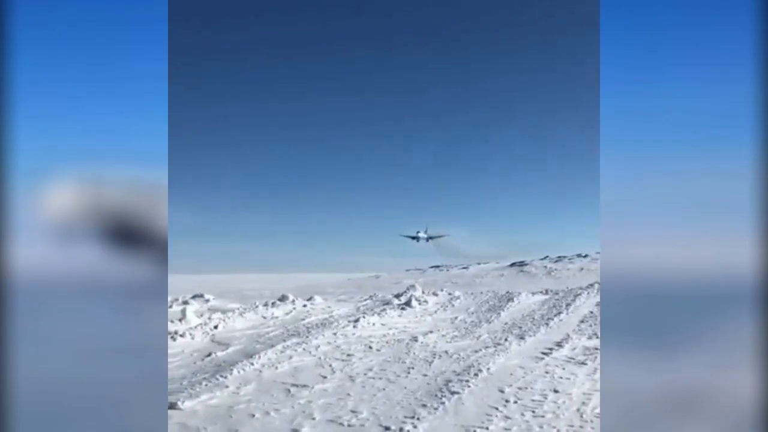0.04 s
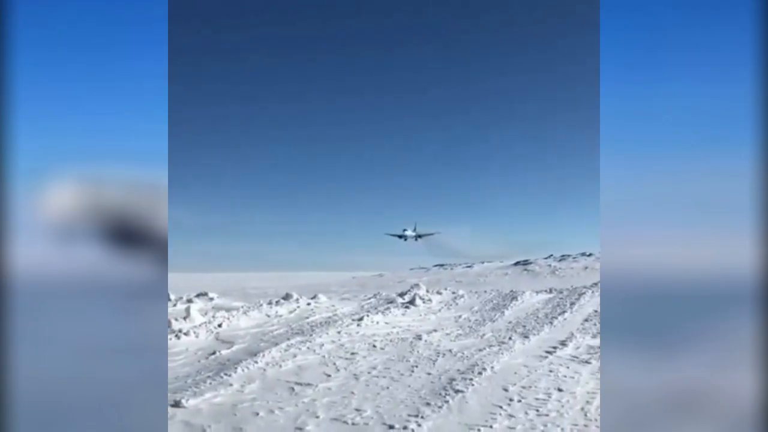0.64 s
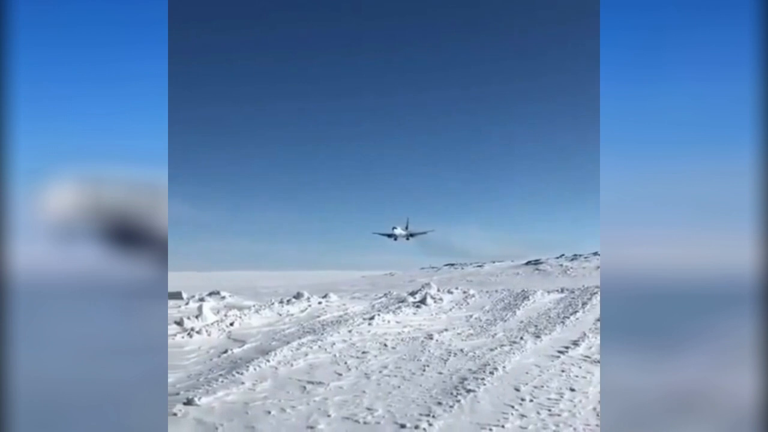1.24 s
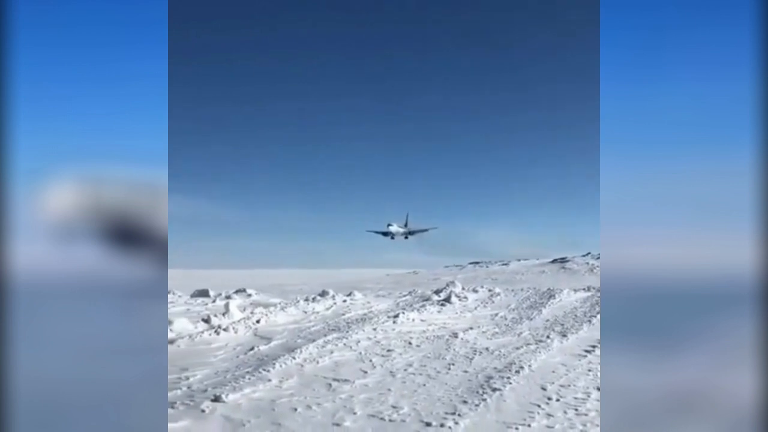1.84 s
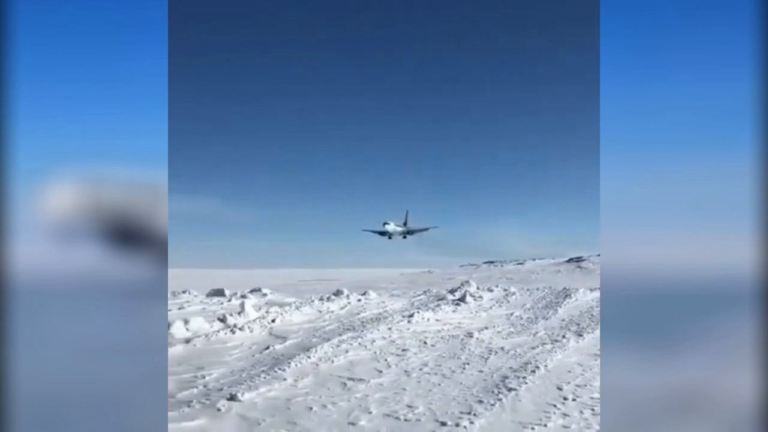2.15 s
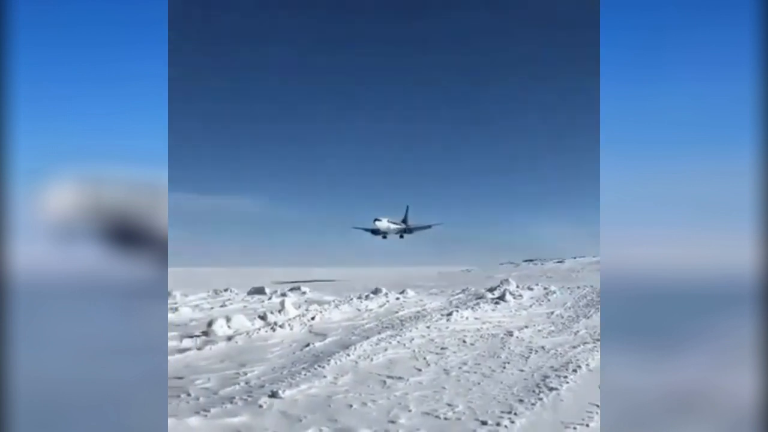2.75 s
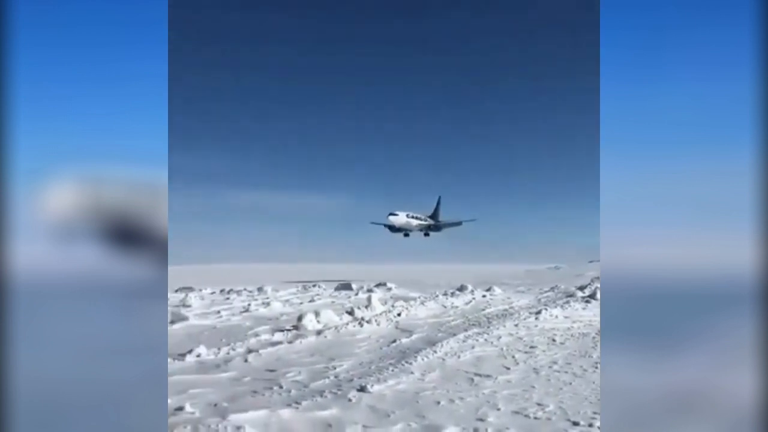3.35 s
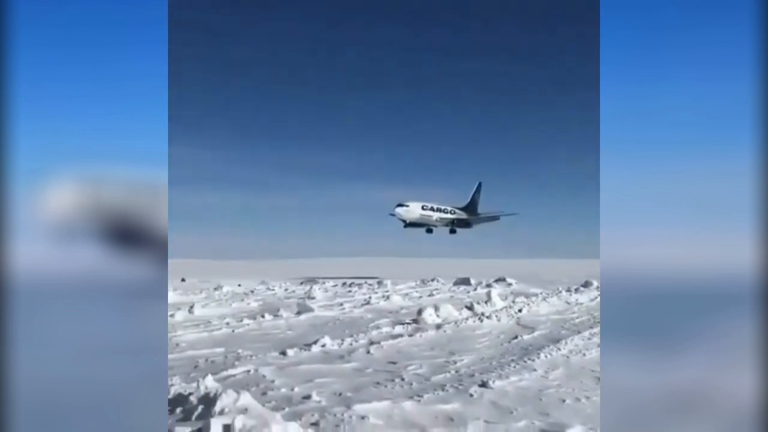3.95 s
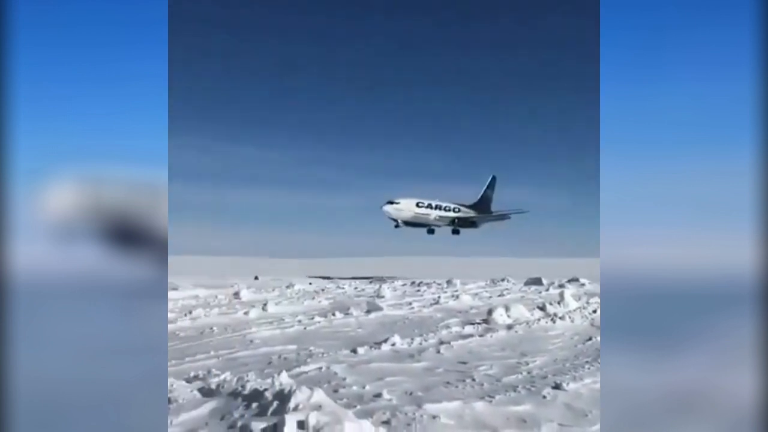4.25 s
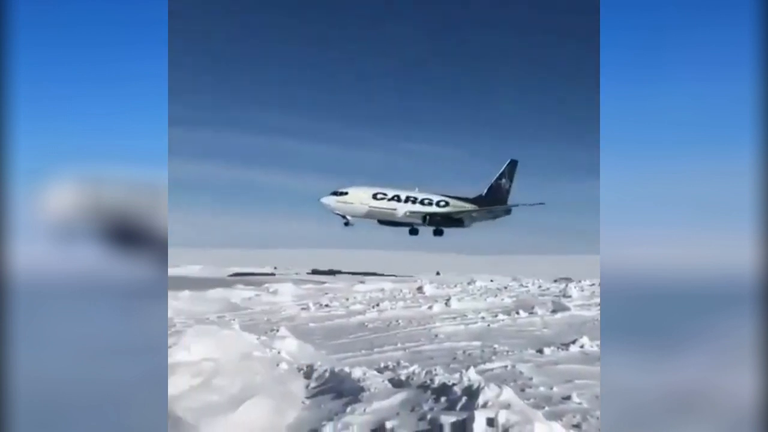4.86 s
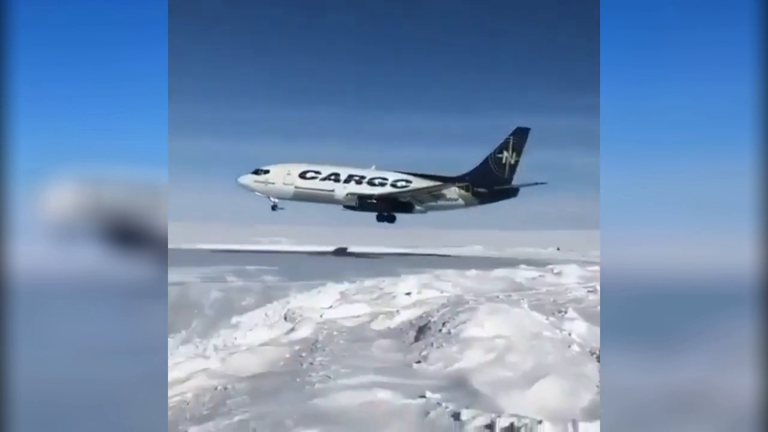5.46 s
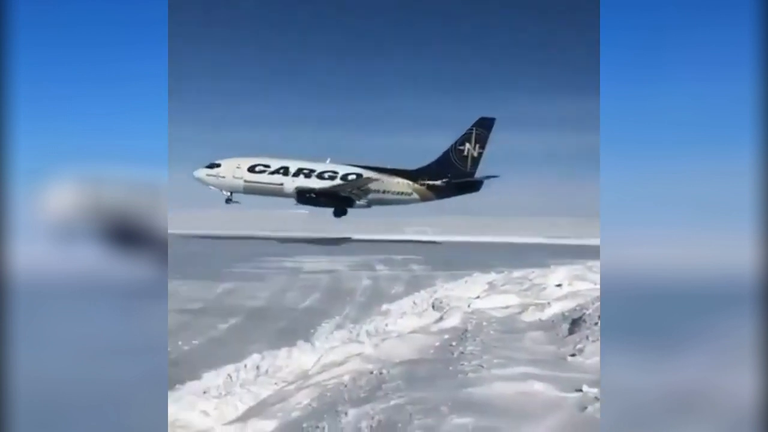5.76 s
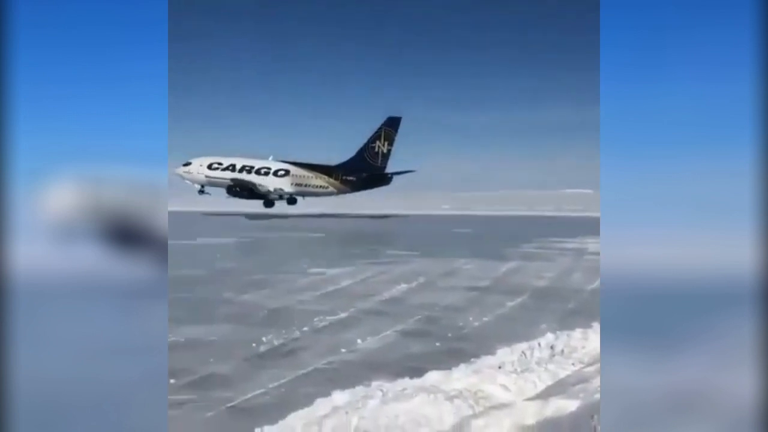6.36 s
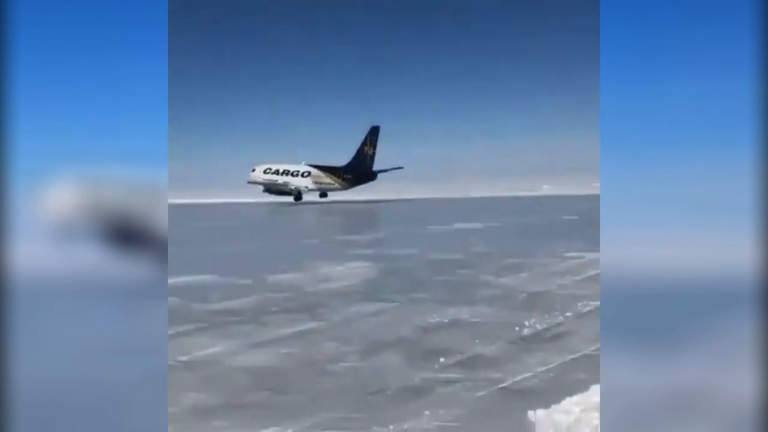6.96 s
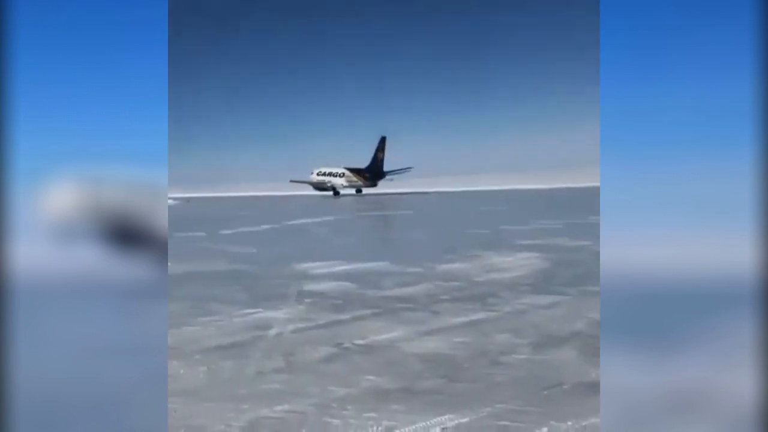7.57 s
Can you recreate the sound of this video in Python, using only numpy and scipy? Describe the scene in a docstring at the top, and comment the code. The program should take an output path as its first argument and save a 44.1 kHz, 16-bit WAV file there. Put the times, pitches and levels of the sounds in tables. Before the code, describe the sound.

A jet airliner approaches low over open snow, starting as a soft rush and low rumble, with a fluttering hiss rising in the first half second. From about 1 second a thin, high turbine whine wavers and flares into short whistles, most strongly between 2 and 4 seconds, while a midrange buzz and a slightly hollow roar build. Around 4.5 to 5 seconds several high whining tones swell together, then fall in pitch and fade. The rush of air is loudest at about 5.3 seconds as the plane passes close. From 5.5 to 6.3 seconds a faint, breathy whistle slides downward inside bright hiss. At about 6 seconds a deep exhaust rumble jumps up and takes over. After 7 seconds the hiss drops away and the roar grows duller and softer, still sounding at the end near 7.7 seconds.

```python
"""Open snow under an approach path: a twin jet airliner comes in low, passes and draws away.
Ahead of it the intake blades whine, buzz and hiss, sinking in pitch and fluttering in the uneven air.
Flaps and landing gear roar loudest abeam, a breathy whistle slides down as the engines go by,
and the exhaust rumble takes over once the tail points this way.
A bounce off the snow sweeps hollows through the roar."""
import sys
import numpy as np
from scipy import signal
from scipy.fft import rfft, irfft
from scipy.io import wavfile
from scipy.ndimage import uniform_filter1d, map_coordinates

SR = 44100
rng = np.random.default_rng(int(sys.argv[2]) if len(sys.argv) > 2 else 0)


def transcribe(u):
    """Save the signal u as a 16-bit wav file named by the first command-line argument.

    u: samples, shape (n,) or (channels, n), limited to [-1, 1]; the rate is SR.
    q: integer samples, one column per channel.
    """
    v = np.clip(np.atleast_2d(u).T, -1, 1)
    q = np.round(v * 32767).astype(np.int16)
    wavfile.write(sys.argv[1], SR, q)


N = 340452
TIME = np.arange(N) / SR
TAIL_TURN_S = 6.095

# the fan shaft winds down for landing: time_s, speed_hz
FAN_SHAFT = [(0, 96.3), (.7, 94.9), (1.5, 93.2), (2.05, 91.95), (3.15, 90.95), (4.35, 89.6), (7.72, 85.2)]
# uneven air focuses a tone into a short whistle: peak_s, length_s, relative_db, tone_name
FLARES = [(.3, 0.68, -54.5, "fan x2"), (.42, 0.075, -49, "stage 4"), (.92, 0.12, -40.5, "compressor"),
          (1.16, 0.08, -46, "compressor"), (1.345, 0.081, -41.5, "compressor"),
          (1.5, .12, -35, "compressor"), (1.56, 0.1, -48, "stage 4"), (1.88, .12, -32, "compressor"),
          (2.073, 0.11, -45, "fan x2"), (2.262, 0.13, -30, "fan x2"), (2.41, 0.09, -30, "compressor"),
          (2.478, .12, -26, "fan x2"), (2.69, 0.15, -28.3, "compressor"), (2.8, 0.12, -31, "fan x2"),
          (3.145, .14, -31.5, "stage 4"), (3.152, 0.18, -41, "stage 1"), (3.505, 0.11, -40, "compressor"),
          (3.73, .12, -41, "fan x2"), (3.764, 0.11, -29, "stage 4"), (3.763, 0.12, -40, "fan x3"),
          (3.93, .08, -36, "stage 4"), (4.338, 0.088, -34, "stage 4"), (4.757, 0.1, -35, "stage 4"),
          (4.96, 0.07, -34, "fan x3")]


def undb(db):
    """Decibels to gain."""
    return 10 ** (np.asarray(db) / 20)


def curves(table):
    """The columns of a table, joined by straight lines in time."""
    times, *columns = np.transpose(table)
    return [np.interp(TIME, times, column) for column in columns]


def walk(rate_hz):
    """A smooth random wobble with a spread of 1."""
    hold = max(int(SR / rate_hz), 2)
    held = np.repeat(rng.standard_normal(N // hold + 2), hold)[rng.integers(hold):][:N]
    smooth = uniform_filter1d(uniform_filter1d(held, hold), hold // 2)
    return smooth / smooth.std()


def swell(peak_s, length_s):
    """A bell-shaped swell of height 1, above half for the given length."""
    return .5 ** ((2 * (TIME - peak_s) / length_s) ** 2)


def swells(table):
    """Level in dB of a row of bell-shaped swells."""
    return sum(db * swell(peak_s, length_s) for peak_s, length_s, db in table)


def beam(peak_s, peak_db, rise_db_s, fall_db_s):
    """Level in dB as a beam of sound sweeps over the listener: a steady climb, then a steady fall."""
    return peak_db - rise_db_s * np.maximum(peak_s - TIME, 0) - fall_db_s * np.maximum(TIME - peak_s, 0)


def split(x, hz):
    """The parts of a sound below and above a frequency."""
    below = signal.sosfiltfilt(signal.butter(2, hz, fs=SR, output="sos"), x)
    return below, x - below


def narrow_noise(phase, width_hz):
    """A narrow band of noise that follows a turning phase; rms 1."""
    return walk(width_hz) * np.sin(phase) + walk(width_hz) * np.cos(phase)


def coloured(x, colour, band_hz):
    """Spectrum of a white sound given a colour and an rms of 1 within the band, and its frequencies."""
    hz = np.arange(N // 2 + 1) * SR / N
    points, db = np.transpose(colour)
    spectrum = rfft(x) * undb(np.interp(np.log(hz + 1), np.log(points), db))
    spectrum *= np.minimum(hz / points[0], 1) ** 2 * np.minimum(points[-1] / (hz + 1), 1) ** 2
    inside = spectrum[(hz > band_hz[0]) & (hz < band_hz[1])]
    return spectrum * N / np.sqrt(2 * np.sum(abs(inside) ** 2)), hz


def turbulence(x, colour, band_hz, churn_db, churn_hz):
    """Coloured noise whose octaves swell and sink on their own as eddies come and go."""
    spectrum, hz = coloured(x, colour, band_hz)
    octave = np.clip(np.log2((hz + 1) / 60), 0, 6)
    out = 0
    for k in range(7):
        layer = irfft(spectrum * np.maximum(1 - abs(octave - k), 0), N)
        out = out + layer * undb(churn_db * np.minimum(walk(churn_hz), 1.3))
    return out


def doppler(speed_m_s=65.6, closest_m=49.9, abeam_s=5.63):
    """Pitch as heard over pitch on board: high on the straight approach, falling through the pass."""
    mach = speed_m_s / 343
    along_m = speed_m_s * (TIME - abeam_s)
    squeeze = 1 - mach ** 2
    return (1 - mach * along_m / np.sqrt(along_m ** 2 + squeeze * closest_m ** 2)) / squeeze


def tail_turn(length_s=.31):
    """A ramp from 0 to 1 as the tail comes to point at the listener."""
    return np.clip((TIME - TAIL_TURN_S) / length_s + .5, 0, 1)


def over_snow(x, soft_hz):
    """The grazing bounce comes back inverted and dull; its changing lag sweeps hollows through the roar."""
    # bounce behind the direct sound: time_s, lag_ms, strength
    bounce = [(0, 0.55, 0.2), (.9, 0.64, 0.22), (1.7, 0.78, 0.36), (2.3, 0.85, 0.34), (3.6, 0.92, 0.09),
              (4.5, 1.5, 0.05), (5.3, 2.5, 0), (6.2, 2.2, 0.06), (7.7, 1.6, 0.02)]
    lag_ms, strength = curves(bounce)
    dull = signal.sosfiltfilt(signal.butter(1, soft_hz, fs=SR, output="sos"), x)
    return x - strength * np.interp(TIME - lag_ms / 1000, TIME, dull)


def falling_whistle():
    """A faint, breathy whistle slides down inside the rush as the engines go by."""
    # the slide as heard: time_s, pitch_hz, level_db
    slide = [(5.4, 8750, -70), (5.6, 8400, -41.5), (5.83, 7400, -37.5), (6.07, 6700, -40), (6.3, 6100, -47),
             (6.7, 5700, -90)]
    hz, db = curves(slide)
    return undb(db) * narrow_noise(2 * np.pi * np.cumsum(hz) / SR, width_hz=320)


def blade_noise(uneven_db, lobe_rate_hz):
    """Unequal blades ripple the intake noise with fine lines that glide with shaft speed and Doppler."""
    shaft_hz = curves(FAN_SHAFT)[0] * doppler()
    order = np.arange(N // 2 + 1) * SR / N / shaft_hz.max()
    # each direction gets another ripple, so faint lines come and go as the aspect turns
    shares = np.array([walk(lobe_rate_hz) for _ in range(4)])
    source = 0
    for share in shares / np.sqrt(np.sum(shares ** 2, axis=0)):
        lines = np.minimum(rng.standard_normal(800), 1.6)
        ripple_db = uneven_db * np.interp(order, np.arange(800) / 2, lines)
        lobe = irfft(rfft(rng.standard_normal(N)) * undb(ripple_db), N)
        source = source + share * lobe / lobe.std()
    gliding = map_coordinates(source, [np.cumsum(shaft_hz / shaft_hz.max())], order=3, mode="wrap")
    # distance blurs the ripple; once the intakes face away, smoother nozzle noise takes over
    rippled = np.interp(TIME, [1.5, 3, 4.8, 5.7], [.55, .85, .9, .3])
    return np.sqrt(rippled) * gliding + np.sqrt(1 - rippled) * rng.standard_normal(N)


def intake_buzz():
    """The unequal fan blades throw a churning midrange buzz ahead of the aircraft."""
    # tone colour: frequency_hz, relative_db
    colour = [(900, -10), (1200, 4.5), (1450, 7), (1680, 3.5), (1850, 1.5), (2000, 5), (2200, -20),
              (2600, -29), (4000, -68)]
    # fader ride: time_s, relative_db
    ride = [(0.15, -45), (1.35, -44), (2.1, -39.5), (3.45, -39), (3.8, -36.5), (4.22, -39), (4.48, -34.5),
            (4.85, -39), (6.73, -42), (7.65, -48.5)]
    blades = blade_noise(uneven_db=7.5, lobe_rate_hz=5)
    buzz = turbulence(blades, colour, band_hz=(1300, 2000), churn_db=2.86, churn_hz=30)
    return buzz * undb(curves(ride)[0] - 1)


def engine_hiss(flutter_db, patchy_db):
    """Blade and nozzle hiss: distance takes off its top, and uneven air makes it flutter."""
    # tone colour: frequency_hz, relative_db
    colour = [(1500, -11.5), (2250, -4), (2850, 0), (3500, 0.5), (4300, -0.43), (5200, 1.5), (6300, 3),
              (7200, 2.5), (8200, 3), (9500, 1.5), (11500, 1), (13000, -1.5), (14500, -4)]
    # fader rides for the body and the top octave: time_s, body_relative_db, top_relative_db
    rides = [(0, -53.5, -53.5), (.5, -40, -48.5), (1.38, -43, -49.5), (1.58, -40.5, -40),
             (1.76, -41, -45.5), (1.92, -39.5, -40), (2.8, -36.5, -34.5), (3.45, -37.5, -33.5),
             (4.2, -36, -32.5), (4.85, -35, -29.5), (5.4, -35.5, -31.5), (5.75, -32.5, -30),
             (6.7, -33.5, -30), (7.15, -35, -34.5), (7.4, -43.5, -39), (7.72, -45, -41.5)]
    body_db, top_db = curves(rides)
    centres_hz = np.geomspace(2200, 13000, 11)
    top_shares = np.interp(centres_hz, [4080, 6060, 10700, 13000], [0, .4, 1, 1.12])
    spectrum, hz = coloured(blade_noise(uneven_db=8, lobe_rate_hz=9), colour, band_hz=(2500, 5000))
    unrest = np.interp(TIME, [0, 3, 4.8, 6.5, 7.5], [.55, .9, .5, .42, .65])
    common_db = flutter_db * walk(46)
    # the focusing that flares the tones also lifts the hiss
    focus_db = 1.4 * sum(swell(peak_s, length_s) for peak_s, length_s, _, _ in FLARES)
    out = 0
    for weights, top_share in zip(np.eye(len(centres_hz)), top_shares):
        band = irfft(spectrum * np.interp(hz, centres_hz, weights), N)
        tilt_db = top_share * (top_db - body_db - 3)
        air_db = unrest * (common_db + patchy_db * walk(36))
        out = out + band * undb(body_db + focus_db + tilt_db + air_db)
    return out


def exhaust_rumble():
    """The exhaust grows slowly on the approach, jumps as the tail turns this way, then fades."""
    # tone colour: frequency_hz, relative_db
    colour = [(22, -30), (40, -11), (62, 1), (95, 0), (150, -1.2), (210, 1), (280, 1), (350, -2),
              (430, -1.5), (610, -2.5), (780, -19), (1300, -43), (2500, -56)]
    # brief swells of the low end: peak_s, length_s, boost_db
    rumbles = [(2.22, 0.21, 8), (2.68, .22, 4), (3.75, 0.23, 5), (6.25, .14, 3), (6.75, 0.4, 0.5)]
    turned = tail_turn()
    jet = turbulence(rng.standard_normal(N), colour, band_hz=(40, 170), churn_db=2, churn_hz=24)
    deep, upper = split(jet, hz=128)
    dark, bright = split(upper, hz=370)
    upper = dark + bright * undb(-14 * np.maximum(TIME - 7.16, 0))  # drawing away, the top fades first
    shade_db = -3 * (1 - turned)  # the aircraft shades all but the low end until the tail turns
    level_db = beam(TAIL_TURN_S, peak_db=-46.5, rise_db_s=2, fall_db_s=3) + 8 * turned
    return (deep * undb(swells(rumbles)) + upper * undb(shade_db)) * undb(level_db)


def airframe_rush():
    """Air rushes past flaps and landing gear, gaining body as the wing comes abeam."""
    # tone colour: frequency_hz, relative_db
    colour = [(110, -27), (165, -10), (215, -4), (270, -4), (345, -7.5), (410, -5), (490, 0.5), (630, -0.5),
              (770, -1.5), (870, 1), (935, 2.5), (1100, .5), (1250, -6.5), (1700, -50)]
    # fader ride: time_s, relative_db
    ride = [(0.15, -41.5), (2.13, -36.5), (2.57, -37.5), (3.3, -35), (4.1, -32), (4.4, -34), (5.16, -33),
            (5.28, -29), (5.45, -29), (5.58, -32), (6.1, -34), (6.94, -41.5), (7.65, -43.5)]
    rush = turbulence(rng.standard_normal(N), colour, band_hz=(420, 1150), churn_db=2, churn_hz=28)
    body, edge = split(rush, hz=770)
    surge_db = 2.5 * swell(peak_s=5.06, length_s=1.34)
    aspect_db = -.7 - 1.5 * tail_turn()  # beamed sideways, the rush sinks as the tail turns this way
    return (body * undb(surge_db) + edge) * undb(curves(ride)[0] + aspect_db)


def blade_tone(hz, wander, fade_db, fade_hz):
    """One trembling blade tone with a hazy skirt, fading in and out through the air."""
    # inflow eddies scatter the tone into haze as the intakes come close: time_s, power_share
    scatter = [(2.8, .04), (3.8, .08), (4.6, .18), (5.2, .38)]
    haze, = curves(scatter)
    phase = 2 * np.pi * np.cumsum(hz * (1 + wander * walk(45))) / SR
    wave = np.sqrt(2 * (1 - haze)) * np.sin(phase) + np.sqrt(haze) * narrow_noise(phase, width_hz=220)
    # paths through the air cancel deeply but add up only a little
    fade = walk(fade_hz)
    return wave * undb(fade_db * np.minimum(fade, .5 * fade))


def intake_whine(far_db, near_db):
    """Fan and compressor rows sing at their blade rates; each tone rides its own beam and flares."""
    # blade tones and the strongest buzz tone: tone_name, multiple_of_shaft_speed
    blade_tone_orders = {"buzz": 15, "fan": 27, "fan x2": 54, "fan x3": 81, "fan x4": 108, "stage 1": 40,
                         "stage 2": 60, "stage 3": 67, "stage 4": 68}
    # the compressor slows on its own shaft: time_s, blade_rate_hz
    compressor = [(0, 4717), (.96, 4652), (1.44, 4613), (2.4, 4468), (2.88, 4414), (3.5, 4365), (4.3, 4287),
                  (7.72, 4100)]
    # beams from the intake sweep over the listener: peak_s, relative_db, rise_db_s, fall_db_s, tone_name
    beams = [(2.7, -42.5, 5, 8, "compressor"), (3.1, -52, 8, 10, "stage 1"),
             (3.85, -38.5, 11, 15, "fan x2"), (4.6, -31.8, 11, 22, "stage 4"),
             (4.68, -35.5, 16, 20, "stage 3"), (4.95, -41, 10, 25, "stage 2"), (4.85, -36, 16, 27, "fan"),
             (4.92, -35.5, 11, 32, "fan x3"), (5.1, -42.5, 25, 30, "fan x4"), (4.5, -38.5, 20, 30, "buzz")]
    # the compressor whistle drops out briefly: centre_s, length_s, depth_db
    dropouts = [(1.06, 0.073, 4), (1.75, 0.072, 15), (2.14, 0.054, -1), (2.57, .05, 4), (2.96, .1, 9)]
    shaft_hz, = curves(FAN_SHAFT)
    onboard_hz = {name: order * shaft_hz for name, order in blade_tone_orders.items()}
    onboard_hz["compressor"] = curves(compressor)[0]
    shift = doppler()
    out = 0
    for peak_s, peak_db, rise_db_s, fall_db_s, name in beams:
        hz = onboard_hz[name] * shift
        flares = sum(undb(db) * swell(s, length_s) for s, length_s, db, which in FLARES if which == name)
        gain = undb(beam(peak_s, peak_db, rise_db_s, fall_db_s)) + flares
        if name == "compressor":
            gain = gain * undb(-swells(dropouts))
        # the tones heard from far ahead are steadier, those that peak near by waver more
        if name in ("compressor", "fan x2"):
            tone = undb(far_db) * blade_tone(hz, wander=.0005, fade_db=3, fade_hz=42)
        else:
            tone = undb(near_db) * blade_tone(hz, wander=.001, fade_db=4, fade_hz=30)
        out = out + gain * tone
    return out


def scene():
    """The aircraft and its ground bounce in open air, the same in both ears."""
    # the level dips briefly: centre_s, length_s, depth_db
    dips = [(2.575, 0.054, 1), (3.025, 0.073, 2), (3.969, 0.015, 5.5), (5.567, 0.022, 4),
            (6.426, 0.017, 4.5)]
    roar = exhaust_rumble() + airframe_rush() + intake_buzz() + engine_hiss(flutter_db=1.36, patchy_db=3)
    sound = over_snow(roar, soft_hz=4400) + intake_whine(far_db=.8, near_db=-1.5) + falling_whistle()
    sound = sound * undb(-swells(dips))
    return np.array([sound, sound])


def record(dry, top_hz=13750):
    """A steep low-pass takes off the very top."""
    return signal.sosfilt(signal.ellip(12, .1, 85, top_hz, fs=SR, output="sos"), dry)


dry = scene()
out = record(dry)
transcribe(out)
```